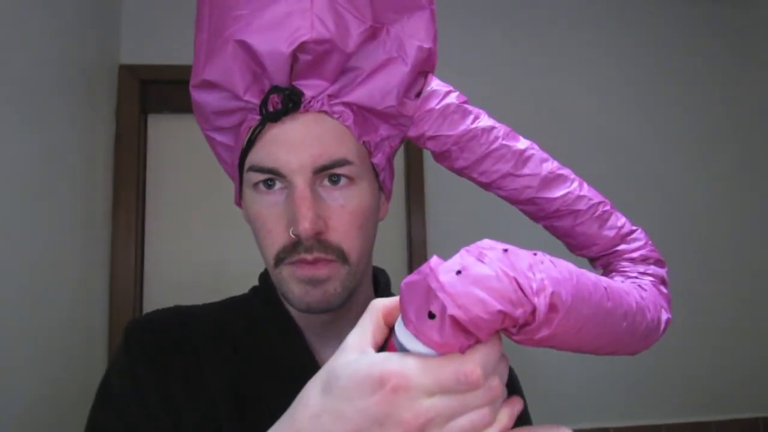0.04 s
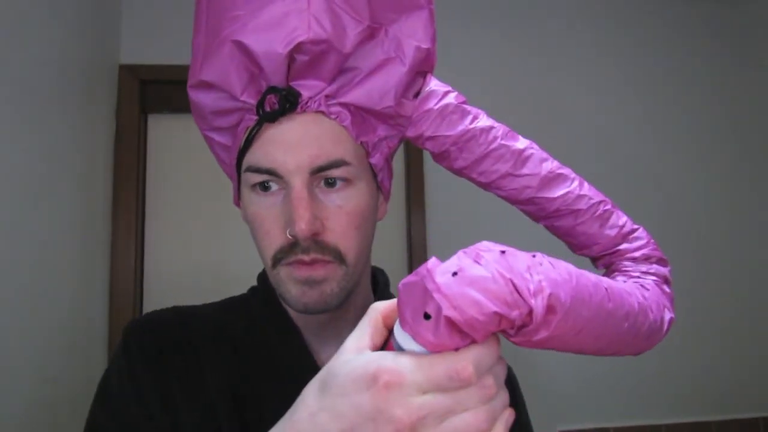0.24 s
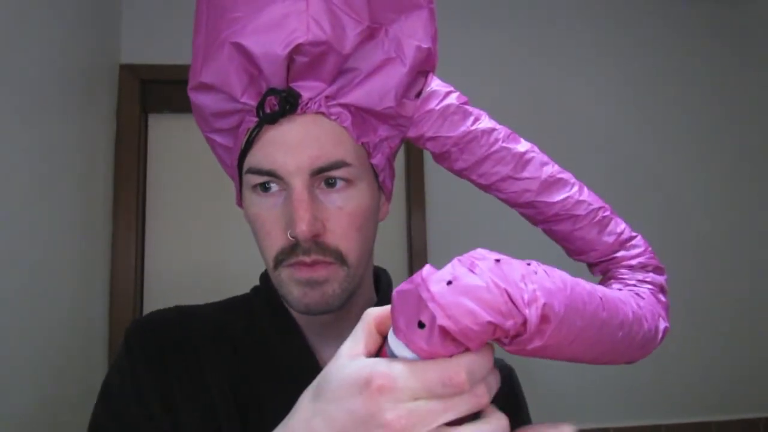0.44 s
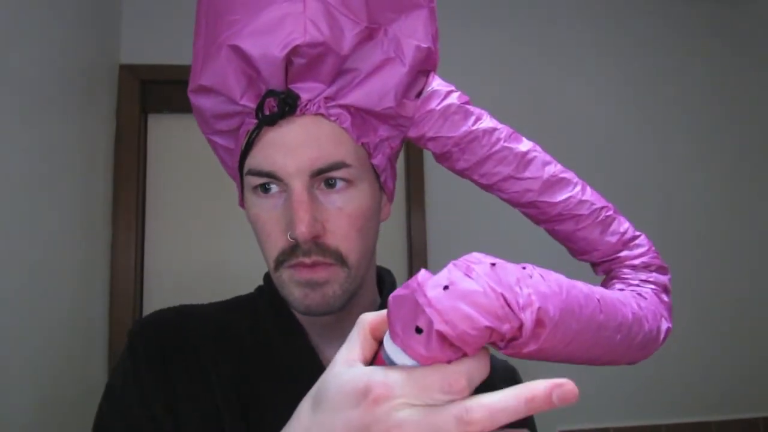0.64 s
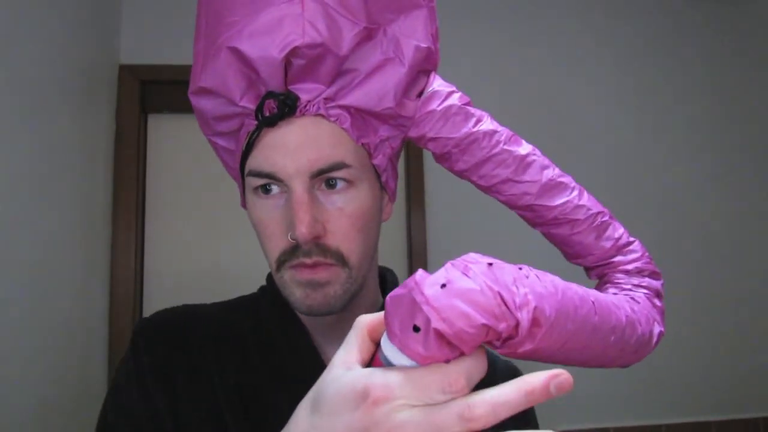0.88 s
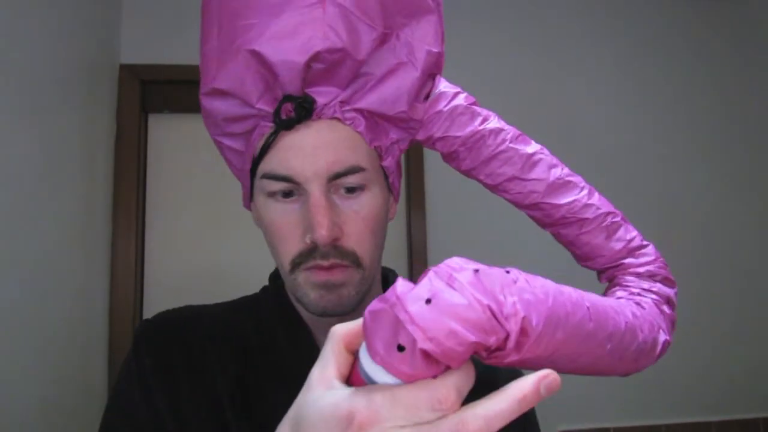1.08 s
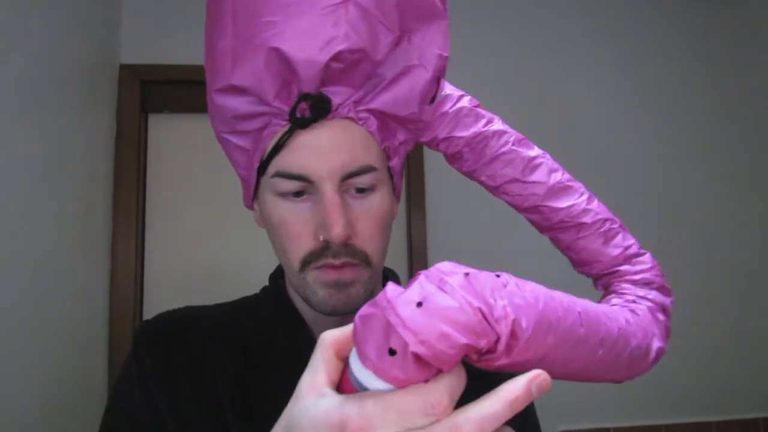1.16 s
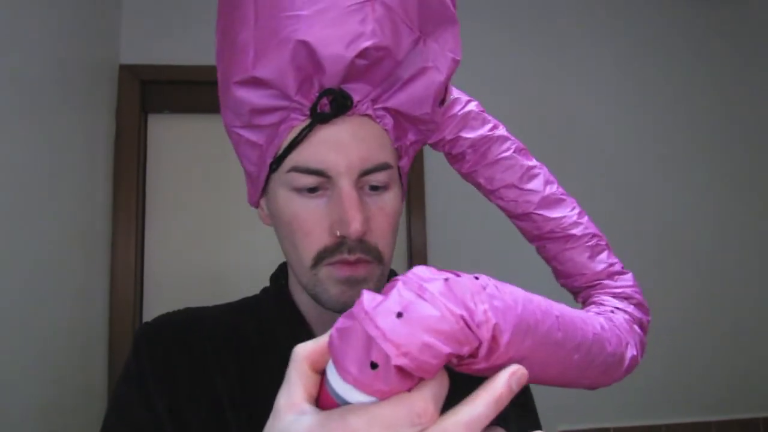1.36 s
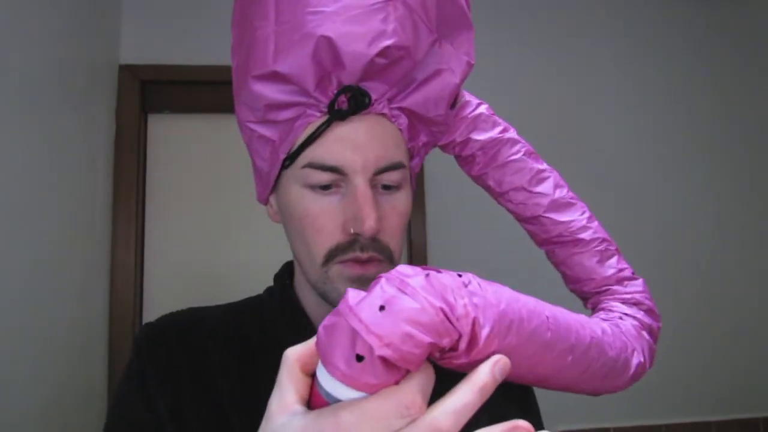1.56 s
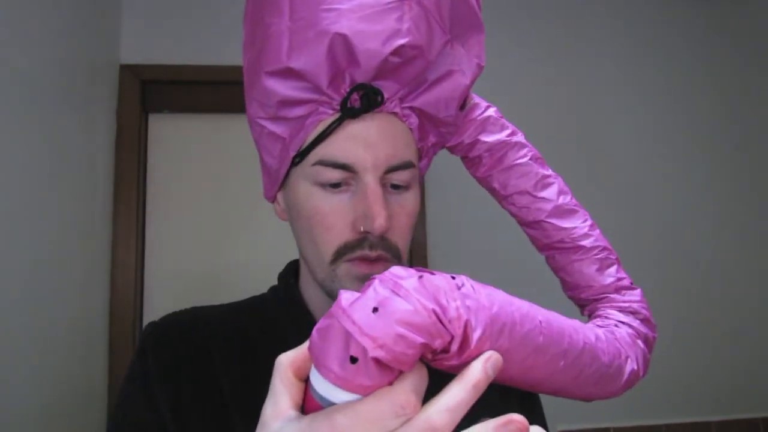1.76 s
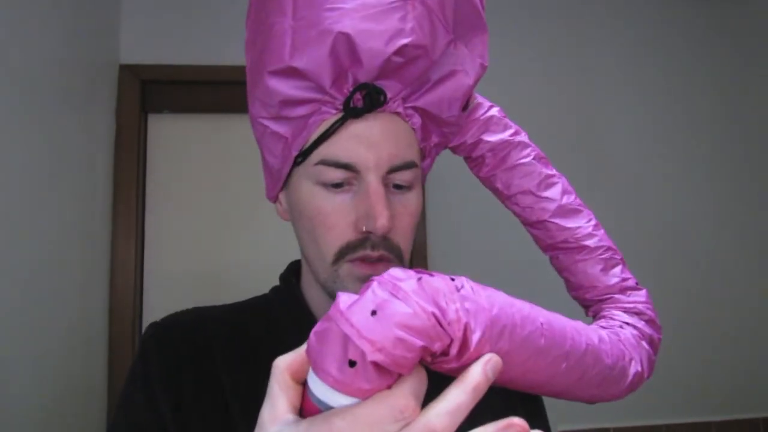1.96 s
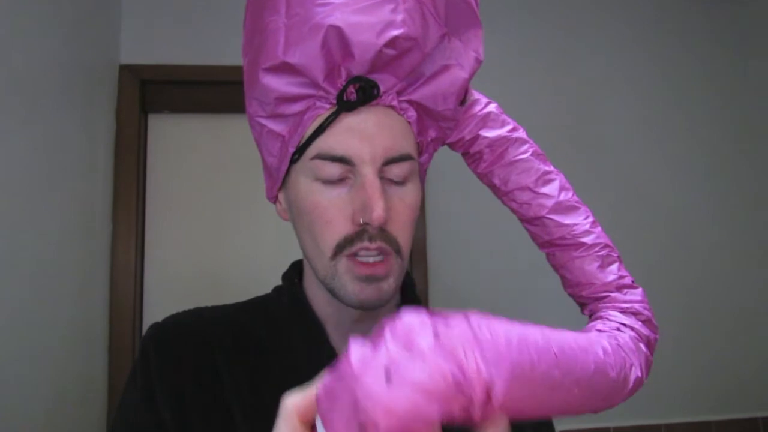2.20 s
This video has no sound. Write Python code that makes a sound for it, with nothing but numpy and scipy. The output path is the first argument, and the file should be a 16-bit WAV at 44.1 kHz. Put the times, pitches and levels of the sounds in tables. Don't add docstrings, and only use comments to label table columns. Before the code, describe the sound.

Close up and slightly to the right, a weak switch click, then three harder cracks on thin hollow plastic, amid fingertip taps and grip rubbing; short bright indoor echo over low steady room hum.

```python
import sys
import numpy as np
from scipy import signal
from scipy.fft import rfft, irfft
from scipy.io import wavfile

SR = 44100
rng = np.random.default_rng(int(sys.argv[2]) if len(sys.argv) > 2 else 0)


def rack_gain(trim_db):
    fader = np.asarray(trim_db, float)
    return 10 ** (fader / 20)


def to_wav(sig):
    pcm = np.clip(np.atleast_2d(sig), -1, 1) * 32767
    pcm = np.round(pcm).astype(np.int16)
    wavfile.write(sys.argv[1], SR, pcm.T)


N = 98387


def colour(x, points):
    hz, db = np.array(points, float).T
    freqs = np.fft.rfftfreq(x.shape[-1], 1 / SR) + 1
    gain = rack_gain(np.interp(np.log(freqs), np.log(hz), db))
    return irfft(rfft(x) * gain, x.shape[-1])


def unit(x):
    return x / np.sqrt(np.mean(x ** 2))


def fade(t, t60):
    return np.exp(-np.log(1000) * t / t60)


# pitch_hz, level_db [dB per Hz]
HUM_SHARED = [(15, -35), (25, 2.5), (92, 6.5), (531, -2.5), (962, -1.5), (1100, -4), (3520, -15),
              (11600, -23), (16000, -27)]
# pitch_hz, level_db [dB per Hz]
HUM_OPPOSITE = [(15, -25), (25, 1), (127, 3), (591, -8), (962, -9.5), (7510, -30.5), (11300, -25.5),
                (14800, -36.5), (16000, -38)]


def hum():
    shared = unit(colour(rng.standard_normal(N), HUM_SHARED))
    opposite = unit(colour(rng.standard_normal(N), HUM_OPPOSITE))
    return rack_gain(-58) * shared + rack_gain(-53.5) * opposite * np.array([[1], [-1]])


# start_s, level_db
GRIP_LEVEL = [(0, -74), (1.1, -62), (1.25, -63), (1.33, -54.5), (1.4, -56.5), (1.416, -42.5),
              (1.445, -77.5), (1.95, -61.5), (2.04, -59.5), (2.23, -56.5)]


def grip():
    start_s, level_db = np.array(GRIP_LEVEL).T
    tint = [(60, -43), (170, -11), (310, -3.5), (500, -8.5), (900, -30)]
    rumble = unit(colour(rng.standard_normal(N), tint))
    return rumble * rack_gain(np.interp(np.arange(N) / SR, start_s, level_db))


# start_s, length_s, level_db, casing_pitch_hz, treble_db [relative]
FINGER_RUBS = [(-.02, 0.053, -62, 2500, -15), (0.198, 0.036, -56, 3000, -2.5),
               (0.374, 0.072, -54.5, 2520, -17), (1.043, 0.099, -57, 2520, -7.5),
               (1.197, 0.06, -52.5, 2480, -10.5), (1.307, 0.032, -52.5, 3500, -30),
               (1.339, 0.045, -48, 3500, -11.5), (1.772, 0.076, -55.5, 1480, -39),
               (1.962, 0.019, -48, 2200, -35), (2.131, 0.17, -53.5, 2500, -19)]


def rubbing():
    grains_per_s, spread_db, hollow_db = 2500, 2.5, 3.5
    out, t = np.zeros(N), np.arange(N) / SR
    for start_s, length_s, level_db, casing_hz, treble_db in FINGER_RUBS:
        when, sign, size = rng.random((3, N))
        grains = (when < grains_per_s / SR) * np.sign(sign - 0.5)
        grains = grains * rack_gain(-spread_db * np.log(size + 1e-4))
        swell = np.sin(np.pi * np.clip((t - start_s) / length_s, 0, 1))
        grains = grains * np.sqrt(swell + 1e-12)
        tint = [(480, -30), (680, hollow_db), (950, hollow_db), (1150, -5), (casing_hz, 0),
                (6000, -7), (9000, treble_db), (14000, treble_db), (16000, treble_db - 13.5)]
        out += unit(colour(grains, tint)) * np.sqrt(length_s * SR / N) * rack_gain(level_db)
    return out


def ring(modes, t, chance, near_hz=None):
    hz, db, t60 = np.array(modes, float).T[:, :, None]
    if near_hz:
        db = db - 6 * np.abs(np.log2(hz / near_hz))
    hz = hz * (1 + 0.02 * chance[:, :1])
    db = db + 2 * chance[:, 1:]
    return (rack_gain(db) * np.sin(2 * np.pi * hz * t) * fade(t, t60)).sum(axis=0)


# pitch_hz, level_db, t60_s
SHELL_RINGS = [(1300, -23, 0.0025), (1750, -16, 0.021), (2260, -20.5, 0.0052), (2700, -19.5, 0.0084),
               (3310, -12, 0.018), (3750, -11, 0.0043), (4130, -9, 0.012), (4950, -22.5, 0.015),
               (5020, 0.5, 0.0021), (6540, -18, 0.00385)]
# pitch_hz, level_db, t60_s
TREBLE_RINGS = [(8700, -3, .003), (10400, -3, .004), (12000, -5, .003), (13500, 0, .005)]
# pitch_hz, level_db, t60_s
HANDLE_RINGS = [(715, -1, .02), (845, 0, .02), (980, -9, .012)]


def blows(rows):
    size = 4096
    out, t = np.zeros((4, N + size)), np.arange(size) / SR
    impulse = 1.0 * (np.arange(size) == 64)
    for k, (start_s, level_db, spot_hz, hollow_db, treble_db) in enumerate(rows):
        chance = np.clip(rng.standard_normal((17, 2)), -2, 2)
        tint = [(500, -20), (spot_hz / 2, -5), (spot_hz, 0), (7000, treble_db / 2 - 0.5),
                (10000, treble_db), (14000, treble_db), (16000, treble_db)]
        crack = rack_gain(-6) * unit(colour(rng.standard_normal(size), tint)) * fade(t, 0.013)
        spot = np.sin(2 * np.pi * spot_hz * t) * fade(t, 0.006)
        shell = ring(SHELL_RINGS, t, chance[:10], spot_hz)
        treble = rack_gain(treble_db + 3) * ring(TREBLE_RINGS, t, chance[10:14])
        hollow = rack_gain(hollow_db) * ring(HANDLE_RINGS, t, chance[14:]) * (1 - fade(t, 0.023))
        direct = (spot + rack_gain(0.5) * shell + crack + treble + hollow) * (1 - fade(t, 0.0011))
        even_click = rack_gain(3) * unit(colour(impulse, tint)) / 16
        to_walls = even_click + rack_gain(-9) * (spot + shell / 2) + 1.18 * hollow
        i = int(start_s * SR)
        out[0, i:i + size] += 0.94 * rack_gain(level_db) * direct
        out[1 + k % 3, i:i + size] += rack_gain(level_db) * to_walls
    thin = signal.butter(4, 724, "high", fs=SR, output="sos")
    return signal.sosfilt(thin, out[:, :N])


# start_s, peak_db, shell_pitch_hz, hollow_db [relative], treble_db [relative]
SWITCH_SNAPS = [(0.0355, -25.5, 2450, -3, -22.5), (0.036, -33.5, 5150, -23, -1),
                (0.956, -31.5, 5300, 2.5, -19), (0.9697, -15, 2840, -11, -18), (0.97, -24, 5350, -40, -32),
                (0.9718, -18, 2090, -10.5, -55), (0.9757, -16.5, 5200, -30, -2.5),
                (1.4043, -14.5, 5630, -33, -1), (1.4088, -35, 6440, -20, -24),
                (1.4137, -8.5, 3280, -24, -15), (1.4138, -6, 4950, -46, -11),
                (1.4155, -6.5, 5510, -34.5, -4.5), (2.021, -47.5, 2400, 19, -28),
                (2.0322, -23, 2880, -11, -30), (2.0341, -6.5, 2950, -14, -14),
                (2.0343, -15, 4940, 2.5, -17), (2.0359, -13.5, 1800, 1, -3), (2.0505, -13.5, 3560, -9, -7)]


def snaps():
    return blows(SWITCH_SNAPS)


# start_s, level_db
LATCH_TIMES = [
    (.040, -29),
    (0.059, -40),
    (0.083, -40),
    (1.218, -40.5),
    (1.235, -37),
    (1.253, -42.5),
]
# pitch_hz, level_db
LATCH_PITCHES = [(2562, 3), (2470, -9), (2700, -12), (5150, -11.5)]


def latch():
    t = np.arange(N) / SR
    tone = sum(rack_gain(db) * np.sin(2 * np.pi * hz * t) for hz, db in LATCH_PITCHES)
    out = np.zeros(N)
    for start_s, level_db in LATCH_TIMES:
        dying = fade(np.clip(t - start_s, 0, 1), 0.022)
        out += rack_gain(level_db) * tone * dying * (t > start_s)
    return out


# start_s, peak_db, shell_pitch_hz, hollow_db, treble_db [relative]
EARLY_TICKS = [(0.131, -36.5, 3300, -9, -16), (0.136, -40, 1240, 2.5, -8), (0.214, -47.5, 2920, 3, -7),
               (0.32, -52.5, 2000, 10, -17), (0.379, -40, 2420, 3, -21), (0.384, -38, 2800, 4, -8),
               (0.427, -41, 2450, 7, -3), (0.456, -41, 1190, -3, -6), (0.552, -42.5, 1090, -12, -8),
               (0.597, -46, 1540, -6, -8), (0.628, -31.5, 1480, 5, -24), (0.632, -36, 2500, 3, -4.5),
               (0.645, -38, 1200, -2, -18), (0.715, -33, 3400, 0, -19), (0.722, -33.5, 1680, 7.5, -34),
               (0.744, -41.5, 1210, 14.5, -21), (0.821, -36, 3100, 0, -19)]
# start_s, peak_db, shell_pitch_hz, hollow_db, treble_db [relative]
LATER_TICKS = [(1.058, -28, 2020, -1.5, -23), (1.075, -30, 2940, -18, -35), (1.11, -33, 1370, -10, -18),
               (1.113, -37, 4850, -20, -5), (1.15, -25.5, 3070, -2, -18.5), (1.161, -26, 1750, -3, -31),
               (1.18, -29, 2270, 0.5, -20), (1.214, -37.5, 5150, 13, -19), (1.219, -32.5, 3750, 9, -26),
               (1.225, -27.5, 2500, -8, -34), (1.232, -35, 3740, -1, -23), (1.237, -29, 1500, 3.5, -34.5),
               (1.279, -38.5, 4000, -7, -12.5), (1.314, -37.5, 3700, 9.5, -26.5),
               (1.554, -29, 1440, -6.5, -22), (1.654, -40, 1385, -12, -30), (1.741, -44, 1530, 7, -11),
               (1.749, -41, 2270, 11, -13.5), (1.771, -44.5, 1218, -7, -29), (1.781, -30, 1454, 7.5, -55),
               (1.782, -40, 1200, 0, -24), (1.806, -35.5, 3200, -1.5, -22), (1.963, -33, 2060, -17, -14.5),
               (1.972, -31.5, 3460, -19, -18), (2.146, -26.5, 3720, 0, -15),
               (2.206, -26.5, 3360, -1.5, -16.5)]


def ticks():
    late_s = 0.000983
    rows = list(EARLY_TICKS) + list(LATER_TICKS)
    return blows([(start_s + late_s, *rest) for start_s, *rest in rows])


# pitch_hz, t60_s
ROOM_DECAY = [(700, 0.25), (1500, 0.26), (3000, 0.28), (6000, 0.24), (12000, 0.22)]
ROOM_LEVELS = [1, -1.5, -2, 0.5, 3.5]
ROOM_SHARED = [0.67, 0.38, 0.26, 0.17, 0.052]


def room(x):
    t = np.arange(int(SR / 2)) / SR
    tail = 0
    for (hz, t60), db, alike in zip(ROOM_DECAY, ROOM_LEVELS, ROOM_SHARED):
        noise = rng.standard_normal((3, len(t)))
        pair = np.sqrt(alike) * noise[0] + np.sqrt(1 - alike) * noise[1:]
        band = colour(pair, [(hz / 3, -30), (hz / 1.3, 0), (hz * 1.3, 0), (hz * 3, -30)])
        tail = tail + unit(band) * np.sqrt(hz / 3000) * rack_gain(db) * fade(t, t60)
    tail = tail * np.clip(t / 0.0018 - 0.5, 0, 1)
    tail = tail / np.sqrt((tail ** 2).sum() / 2)
    return rack_gain(-3.5) * signal.fftconvolve(x[None], tail, axes=1)[:, :N]


# pitch_hz, level_db
EAR_DIFFERENCE = [(4500, -13), (8300, 0), (13000, -0.5)]


def scene():
    hits, rubs, singing = snaps() + ticks(), rubbing(), latch()
    near = hits[0] + rubs + rack_gain(-9) * singing
    pan = rack_gain(np.array([[-3], [3]]) / 2)
    difference = np.roll(colour(near, EAR_DIFFERENCE), 9) * np.array([[1], [-1]])
    dark_tails = signal.butter(8, 13370, fs=SR, output="sos")
    to_walls = signal.sosfilt(dark_tails, np.vstack([hits[1:], rubs + singing]))
    tails = sum(room(x) for x in to_walls)
    return near * pan + difference + tails + hum() + grip()


def band_limit(x):
    return signal.sosfilt(signal.butter(12, 16820, fs=SR, output="sos"), x)


def record(dry):
    held = np.clip(dry, -0.95, 0.95)
    top_cut = signal.ellip(6, 0.3, 60, 15700, fs=SR, output="sos")
    mix = signal.sosfilt(top_cut, held)
    return band_limit(mix)


dry = scene()
out = record(dry)
to_wav(out)
```